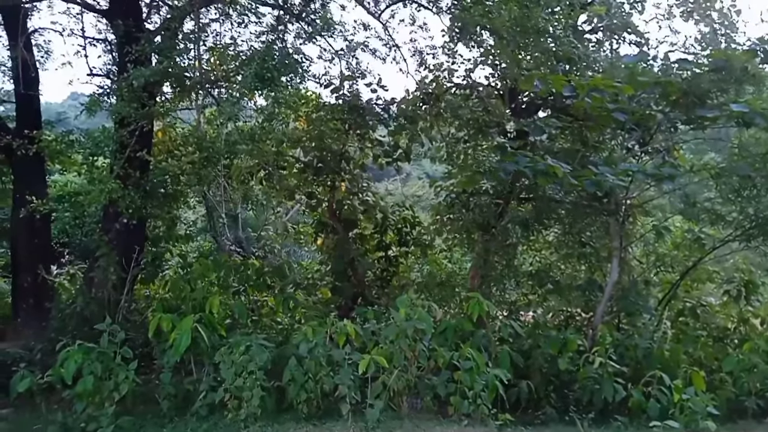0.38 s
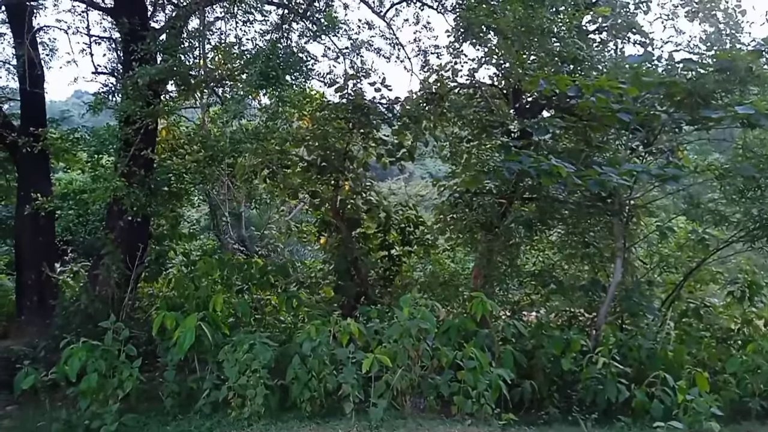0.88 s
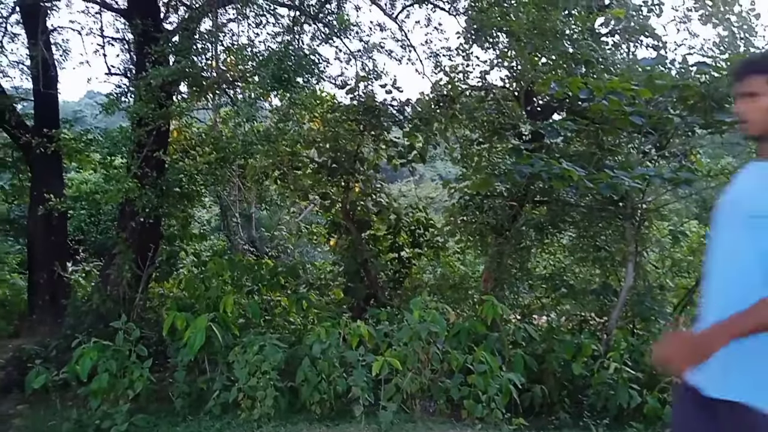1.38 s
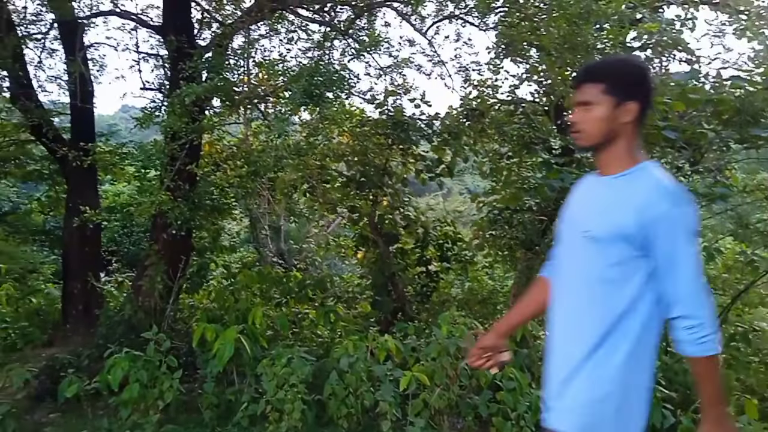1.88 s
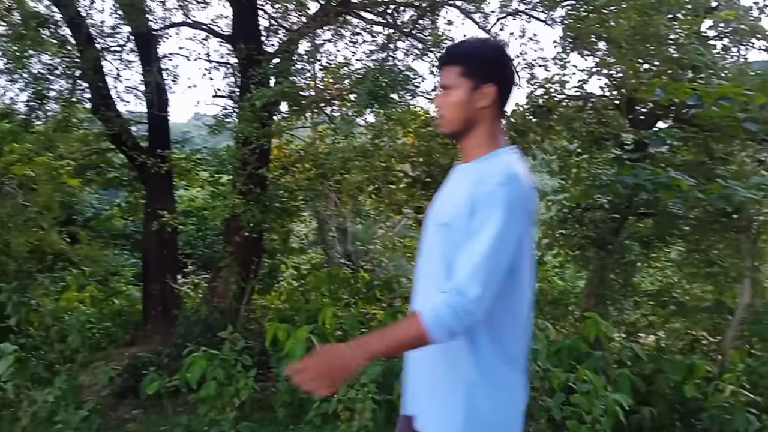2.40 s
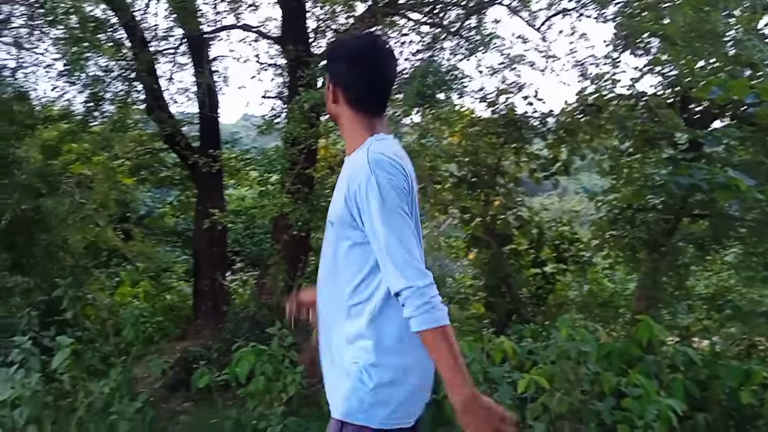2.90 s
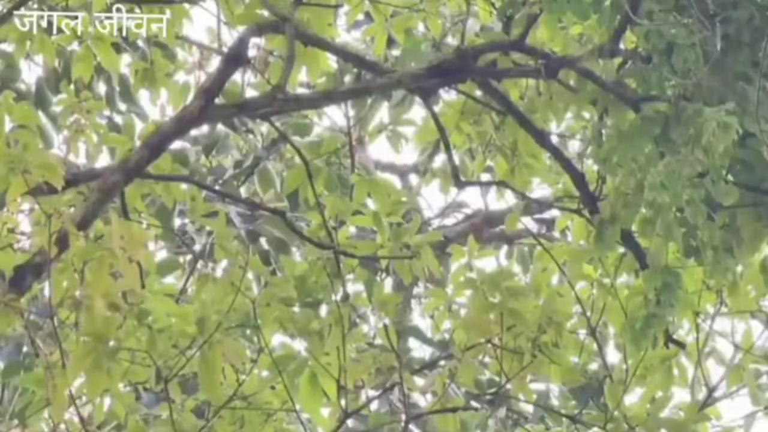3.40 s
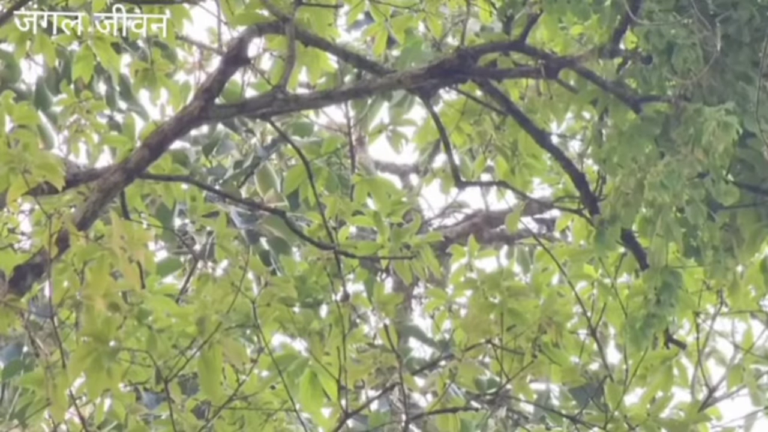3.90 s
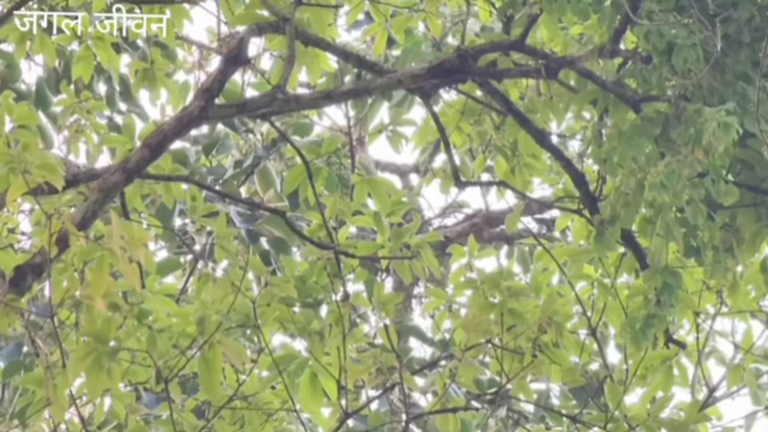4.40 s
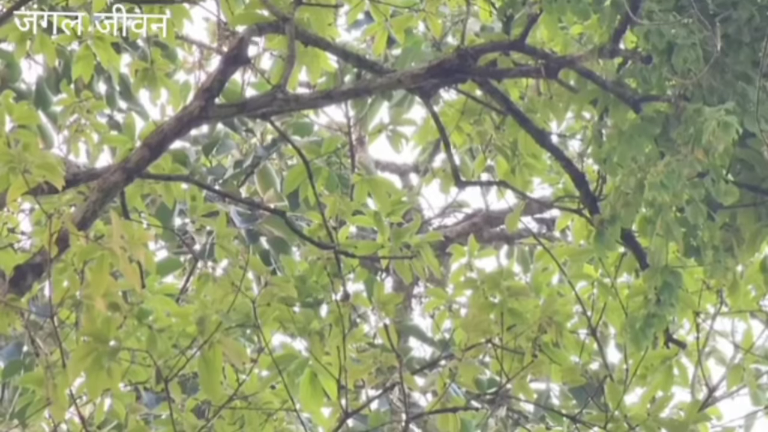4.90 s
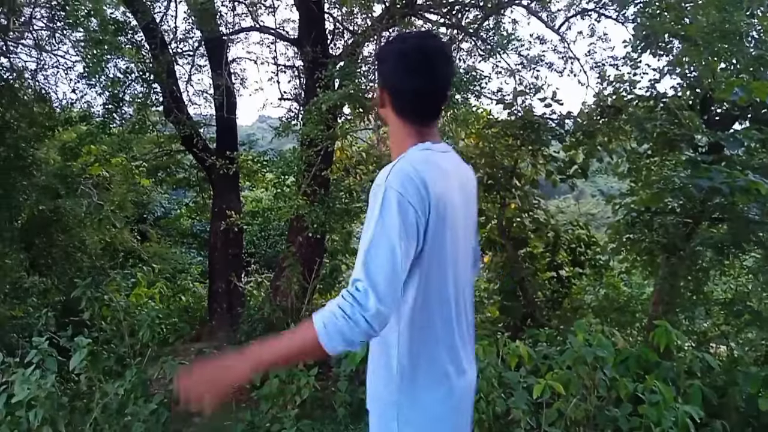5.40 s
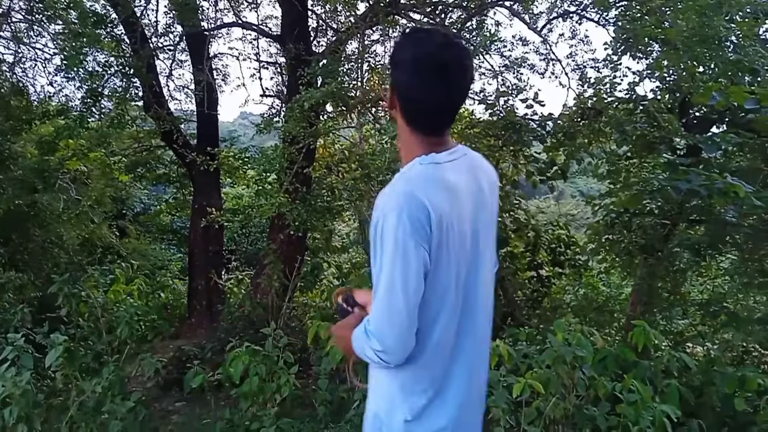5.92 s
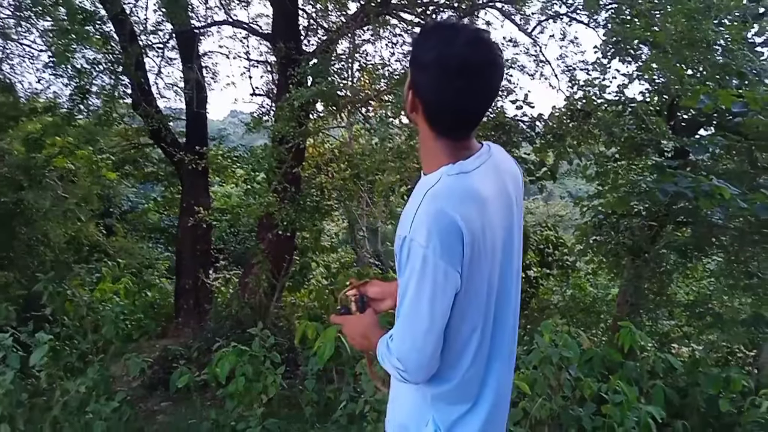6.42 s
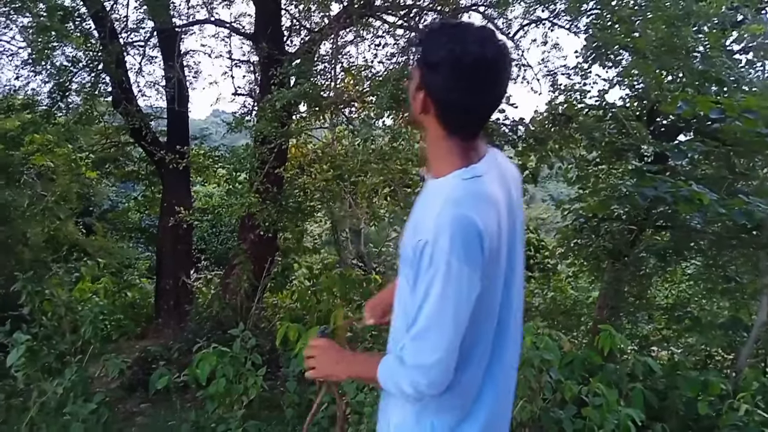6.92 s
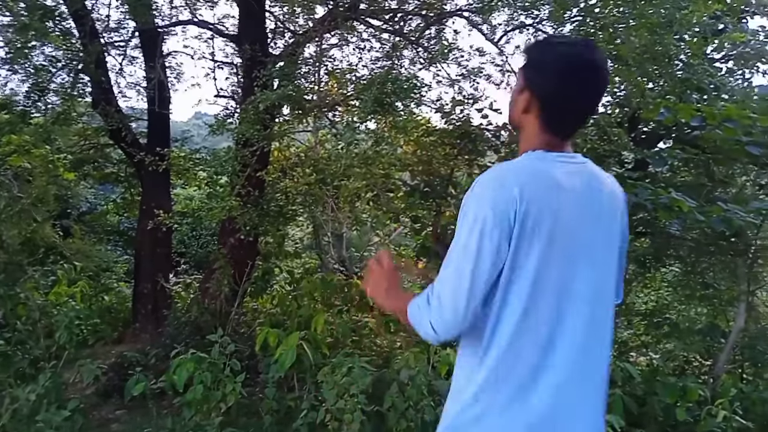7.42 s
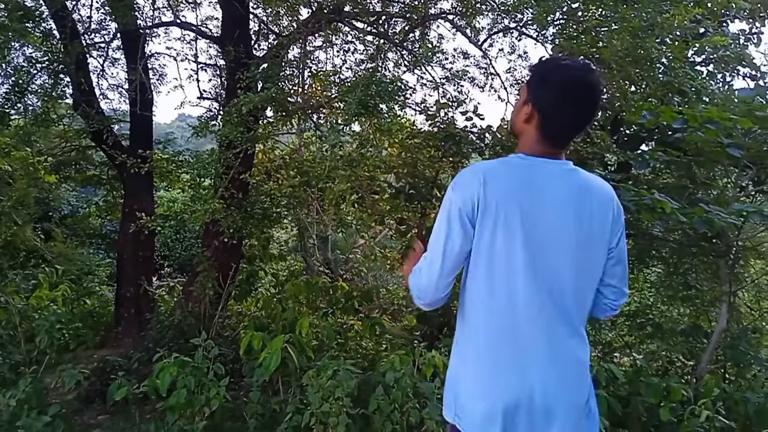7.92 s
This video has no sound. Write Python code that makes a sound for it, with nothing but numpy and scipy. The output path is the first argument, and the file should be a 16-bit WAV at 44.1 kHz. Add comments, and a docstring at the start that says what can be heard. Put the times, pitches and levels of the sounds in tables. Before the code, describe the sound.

Cicadas drone shrilly in a forest with soft leaf steps, cut by two seconds of louder windy canopy full of whistling, trilling, cooing birds.

```python
"""Cicadas drone in a forest, each a pulse train of drum clicks ringing in one band, over soft air and hum.
Someone treads softly through leaf litter close to a phone with one microphone: ringing snaps, crackling grains.
For two seconds the scene fades over to a louder, windy canopy: coloured noise hiss, with treble bands switched
to random levels, and low rumble. There gliding near-sine notes make falling whistles, trills, hoots and coos,
throbbing bands of noise make the insects, and short noisy patches sag near 3.5 kHz."""
import sys
import numpy as np
from scipy import signal
from scipy.fft import rfft, irfft, next_fast_len
from scipy.io import wavfile
from scipy.ndimage import uniform_filter1d

SR = 44100
rng = np.random.default_rng(int(sys.argv[2]) if len(sys.argv) > 2 else 0)


def invert_db(x):
    """Field ratio 10**(x/20) for x, a level in decibels (scalar or array-like)."""
    u = np.asarray(x, float) / 20
    return 10 ** u


def wav_out(sig):
    """Save sig, one row per channel (or a flat mono array), as 16-bit PCM at SR to the path in sys.argv[1]."""
    wavfile.write(sys.argv[1], SR, np.round(np.clip(np.atleast_2d(sig).T, -1, 1) * 32767).astype(np.int16))


N = 355093
T = np.arange(N) / SR

# forest fader, one span before the canopy and one after: time_s, cicada_level_db
FOREST_FADE = [
    [(0.0, -58), (0.05, -61), (0.12, -52), (1.7, -52), (3.35, -52.5), (3.44, -68.5)],
    [(5.5, -63), (5.58, -53.5), (8.06, -52.5)],
]
# tone of the whole cicada chorus: freq_hz, gain_db
CICADA_TONE = [(3410, -67), (5800, -32), (6370, -24.5), (6570, -26), (6960, -15), (7950, -14.5), (8940, -7),
               (9310, -1.5), (10300, -11), (11700, -21.5), (12700, -38), (13500, -38), (14700, -22),
               (15200, -20.5)]
# spectrum of the air, an early curve and a late one: freq_hz, density_db (relative, per Hz)
AIR_TONES = [
    [(15, -43), (25, -10), (38, -19), (81, 1), (184, -5.5), (231, -1.5), (606, -9.5), (728, -10),
     (1910, -15), (4880, -24.5), (6000, -21.5), (7800, -57), (13200, -120)],
    [(15, -69), (25, -27), (48, -22), (65, -4), (160, -3.5), (201, -4), (237, -7.5), (265, -11),
     (341, -9.5), (3380, -25), (6000, -31.5), (7800, -56), (13200, -120)],
]
# one cicada a row: buckling_pairs_per_s, body_centre_hz, body_width_hz, level_db (relative)
SINGERS = [(375.3, 7930, 3000, 0), (368.2, 7240, 1200, -5.5), (396.7, 9330, 3070, -1),
           (399.8, 9540, 4300, 0.5), (403.6, 9600, 3500, -5.5)]
# distant hum partials: pitch_hz, level_db (rms before it wanders, with the forest fader at -52.5 dB)
HUM = [(80.7, -88), (156.1, -82), (236.9, -82.5)]
# faint gliding far whistles: start_s, end_s, from_hz, to_hz, middle_level_db
FAR_WHISTLES = [(.004, 0.073, 3080, 3000, -80), (3.375, 3.665, 2140, 2133, -54.5),
                (3.82, 4.004, 1850, 1930, -56.5), (3.988, 4.14, 1710, 1630, -54.5),
                (5.08, 5.24, 2436, 2466, -55), (5.38, 5.543, 1113, 1150, -49.5)]
# twigs and leaves snapping: start_s, ring_level_db, ring_hz, crack_level_db
SNAPS = [(0.2353, -56, 2810, -63), (0.531, -58, 1630, -49), (0.6848, -63, 2550, -76),
         (0.894, -56, 2150, -76), (1.076, -61, 2670, -75), (1.344, -56, 1800, -60),
         (1.3668, -48.5, 1470, -50), (1.3794, -57, 2810, -71), (1.4517, -53.5, 2850, -57),
         (1.6389, -49.5, 1520, -54), (1.9, -49.5, 3200, -59), (2.1106, -65, 2080, -62),
         (2.233, -56.5, 1650, -57.5), (2.3082, -45, 2370, -56), (2.496, -58, 3800, -58),
         (2.68, -57, 1810, -60), (2.82, -59, 2250, -57), (3.628, -37, 1750, -58), (7.268, -58, 2140, -52.5),
         (7.3975, -56, 3580, -63), (7.5443, -62, 2850, -75), (7.79, -60, 3440, -67),
         (7.8248, -57, 3660, -65)]
# leaves brushed: start_s, end_s, centre_hz, width_hz, level_db
RUSTLES = [(0.227, 0.256, 3500, 2500, -76), (0.35, 0.426, 2380, 2200, -74), (0.454, 0.531, 1150, 1000, -70),
           (0.74, 0.801, 3940, 3000, -73), (0.757, 0.96, 2000, 2400, -77.5),
           (1.339, 1.399, 2570, 3800, -66), (1.392, 1.517, 3000, 3000, -78),
           (1.885, 1.916, 3000, 3000, -69), (2.02, 2.09, 2200, 2200, -78),
           (2.467, 2.574, 3700, 1400, -78.5), (2.62, 2.73, 2410, 2200, -74),
           (3.117, 3.175, 3700, 3500, -76.5), (7.242, 7.306, 3500, 2500, -76),
           (7.32, 7.498, 2190, 805, -82.5), (7.355, 7.496, 3800, 1900, -78), (7.533, 7.56, 3300, 2610, -72),
           (7.767, 7.835, 3950, 1600, -73.5), (7.792, 7.872, 2470, 1200, -80.5)]
# spectrum of the canopy hiss before its treble bands are switched: freq_hz, density_db (relative, per Hz)
HISS_TONE = [(88, -32), (150, -6), (590, -10), (715, -17), (1160, -7), (1540, -12), (3800, -13.5),
             (4300, -5.5), (5100, -12.5), (6200, -9.5), (6950, -20.5), (8250, -18), (10000, -30),
             (15000, -25)]
# edges of the treble bands switched to random levels: edge_hz
PATCH_EDGES = [3200, 4000, 4800, 5600, 6800, 8000, 9600, 12000, 12600, 13200, 13800, 14400, 15200]
# canopy hiss fader: time_s, level_db (rms from 1500 to 3030 Hz, before it wanders)
HISS_FADE = [(3.29, -80), (3.35, -59.5), (3.42, -56), (4.3, -55), (5.2, -55), (5.45, -50.5), (5.55, -54),
             (5.62, -63), (5.632, -69), (5.68, -72)]
# spectrum of the wind rumble: freq_hz, density_db (relative, per Hz)
WIND_TONE = [(12, -27), (20, 3), (134, -0.5), (193, -11.5), (296, -7.5), (400, -16), (520, -45),
             (880, -120)]
# wind gusts: time_s, level_db
GUST_FADE = [(3.3, -84), (3.37, -58.5), (3.45, -57.5), (3.92, -56), (4.55, -58.5), (5.0, -56.5),
             (5.1, -53.5), (5.45, -54), (5.52, -49), (5.62, -54.5), (5.635, -79)]
# far murmur of birds: time_s, level_db (of each of its two pitches)
MURMUR_FADE = [(3.32, -76), (3.38, -57), (3.6, -57.5), (3.77, -68), (4.13, -55.5), (4.47, -66), (4.95, -53),
               (5.2, -70.5), (5.49, -51), (5.57, -54), (5.63, -85)]
# bird trills: start_s, end_s, centre_hz, level_db
TRILLS = [(3.368, 3.497, 5450, -38.5), (3.866, 4.026, 5350, -38.5), (4.124, 4.213, 5500, -45.5),
          (4.28, 4.384, 5600, -41.5), (4.459, 4.56, 5450, -38), (4.7, 4.778, 5500, -40.5),
          (4.806, 4.932, 5400, -39.5), (5.043, 5.147, 5600, -45.5)]
# stretches where throbbing insect noise is heard, low band and high band: start_s, end_s, centre_hz, level_db
CHIRRS = [(3.37, 3.701, 6050, -49), (3.709, 3.977, 6150, -47), (4.012, 4.12, 6160, -46.5),
          (4.13, 4.211, 6120, -45), (4.234, 4.38, 6100, -47.5), (4.396, 4.421, 6200, -49.5),
          (4.44, 4.536, 6000, -45.5), (4.596, 4.757, 6130, -45.5), (4.777, 4.796, 6150, -43),
          (4.837, 4.936, 6100, -45.5), (4.962, 5.119, 6150, -46.5), (5.158, 5.18, 6100, -51),
          (5.3, 5.413, 6100, -54), (5.513, 5.626, 6030, -56.5), (3.504, 3.648, 7370, -51),
          (3.774, 3.822, 7000, -48.5), (4.25, 4.338, 8200, -56), (4.4, 4.462, 7900, -49.5),
          (4.615, 4.855, 7550, -57), (4.997, 5.024, 7000, -46), (5.216, 5.232, 7270, -47),
          (5.253, 5.269, 7300, -46.5), (5.321, 5.378, 7450, -49), (5.42, 5.543, 7700, -56.5)]
# the low insect band, then the high one: width_hz, throbs_per_s
CHOIRS = [(840, 58), (620, 88)]
# a far barbet repeating a hollow note: start_s, level_db, pitch_hz
HOOTS = [(3.456, -42.5, 1139), (3.556, -47, 1124), (3.629, -45, 1156), (3.9947, -45, 1170),
         (4.064, -44.5, 986), (4.1357, -42.5, 1030), (4.195, -42.5, 1138), (4.2835, -42, 1161),
         (4.8136, -46.5, 1220), (4.8837, -48, 1150), (4.95, -38, 1255), (5.029, -47.5, 1148),
         (5.492, -42, 1196)]
# the slide every falling whistle shares: after_knee_s, pitch_hz, breath (0-1)
SLIDE = [(0, 4023, 0.24), (.04, 3873, 0.5), (.1, 3753, .24), (.15, 3573, .4), (.22, 3110, .6),
         (.3, 2845, 0.9), (.37, 2577, .95)]
# falling whistles: knee_s, dive_hz_per_s, audible pieces (start_s, end_s, level_db)
FALLS = [(3.7, 13000, [(3.645, 3.724, -46.5), (3.736, 3.762, -38), (3.794, 3.83, -37.5),
         (3.826, 3.856, -34), (3.872, 3.9, -46.5), (3.905, 3.945, -46.5), (3.95, 4.0, -46),
         (3.995, 4.07, -50)]), (3.998, 5500, [(4.012, 4.04, -41.5), (4.052, 4.1, -41), (4.113, 4.14, -44),
         (4.195, 4.25, -44.5), (4.25, 4.34, -51.5)]), (5.21, 7800, [(5.115, 5.15, -42.5),
         (5.145, 5.195, -37)]), (5.206, 22700, [(5.152, 5.172, -39), (5.163, 5.188, -28),
         (5.182, 5.205, -29), (5.198, 5.279, -35.5), (5.293, 5.32, -32.5), (5.352, 5.38, -31.5),
         (5.42, 5.53, -45), (5.525, 5.57, -53)])]
# short noisy patches near 3.5 kHz: start_s, end_s, middle_level_db
NOISE_PATCHES = [(3.936, 3.961, -39.5), (3.969, 4, -44.5), (4.156, 4.183, -41), (5.388, 5.417, -37),
                 (5.456, 5.476, -42), (5.517, 5.542, -47)]
# a cooing bird: start_s, end_s, pitch_hz, level_db (after the attack), end_level_db
COOS = [(4.666, 4.874, 1438, -37.5, -50), (4.86, 4.977, 1433, -48, -45), (4.666, 4.721, 1308, -42, -49.5),
        (4.9, 5.007, 1315, -38.5, -34.5), (5.052, 5.17, 1320, -46.5, -37), (5.157, 5.314, 1378, -44, -43.5),
        (5.309, 5.5, 1380, -45.5, -53)]
# one breathy rising answer: start_s, end_s, from_hz, to_hz, level_db
ANSWER = (5.215, 5.367, 4760, 5450, -44)


def unit(x):
    """Scale to rms 1."""
    return x / np.sqrt(np.mean(x ** 2))


def colour(x, points):
    """Filter by (Hz, dB) points joined on a log frequency axis."""
    size = next_fast_len(len(x))
    hz, db = np.transpose(points)
    f = np.maximum(np.arange(size // 2 + 1) * SR / size, 1)
    curve = invert_db(np.interp(np.log(f), np.log(hz), db))
    return irfft(rfft(x, size) * curve, size)[:len(x)]


def band(x, lo_hz, hi_hz, order=2):
    """Band-pass with Butterworth slopes."""
    return signal.sosfilt(signal.butter(order, [lo_hz, hi_hz], "band", fs=SR, output="sos"), x)


def fader(spans):
    """Gain through one or more spans of (s, dB) points, silent outside them."""
    total = 0
    for span in spans:
        s, db = np.transpose(span)
        total = total + invert_db(np.interp(T, s, db, left=-200, right=-200))
    return total


def walk(rate, n=N):
    """Random levels held 1 / rate s and slewed twice; spread near 1."""
    hold = int(SR / rate)
    held = np.repeat(rng.standard_normal(n // hold + 1), hold)
    return 1.3 * uniform_filter1d(uniform_filter1d(held, hold), hold)[:n]


def clicks(rate, scatter_db, weak_db):
    """A band-limited click at each turn of the phase; every second one is shifted by weak_db."""
    phase = np.cumsum(rate) / SR + rng.random()
    turn = np.round(phase).astype(int)
    off = (phase - turn) / rate * SR  # samples from the nearest click
    scatter = scatter_db * rng.standard_normal(N // 20)[turn]
    size = invert_db(scatter + weak_db * (turn % 2))
    return size * np.sinc(.8 * off) * np.exp(-(off / 8) ** 2)


def trees(x, t60, wet_db):
    """Trunks and leaves scatter the sound into a dense tail that falls 60 dB in t60 seconds."""
    t = np.arange(SR // 2) / SR
    tail = rng.standard_normal(len(t)) * np.exp(-np.log(1000) * t / t60)
    return x + invert_db(wet_db) * signal.fftconvolve(x, tail / np.linalg.norm(tail))[:len(x)]


def burst(start, end, hz, width, noise, edge):
    """Sample places and a stretch of noise ringing in one band; edge: both fades together, in samples."""
    i = np.arange(int(start * SR), int(end * SR))
    ring = unit(band(noise, hz - width / 2, hz + width / 2, order=3))[-len(i):]
    return i, ring * signal.windows.tukey(len(i), min(edge / len(i), 1))


def whistles(notes, blur_hz, flutter_db):
    """Near-sine notes of (s, Hz, dB, breath) points; breath trades the clean tone for a noisy band around it."""
    out = np.zeros(N)
    for note in notes:
        s, hz, db, breath = np.transpose(note)
        i = np.arange(int(s[0] * SR), int(s[-1] * SR))
        hz, db, breath = (np.interp(T[i], s, c) for c in (hz, db, breath))
        breath = np.clip(breath, 0, 1)
        wobble = walk(blur_hz, len(i)) + 1j * walk(blur_hz, len(i))
        carrier = np.exp(2j * np.pi * np.cumsum(hz) / SR)
        tone = carrier * (np.sqrt(2 - 2 * breath) + np.sqrt(breath) * wobble)
        level = invert_db(db + flutter_db * walk(70, len(i)))
        out[i] += level * tone.real * signal.windows.tukey(len(i), min(400 / len(i), 1))
    return out


def cicadas():
    """Each singer buckles its two drums in turn, strong then weak; the wavering pace blurs the high lines."""
    choir = 0
    for pairs, hz, width, db in SINGERS:
        pace = 1 + .002 * walk(3) + .0045 * walk(45)
        drum = clicks(2 * pairs * pace, scatter_db=2.0, weak_db=-16.0)
        body = band(drum, hz - width / 2, hz + width / 2)
        far = trees(body, t60=.15, wet_db=1.5)
        choir = choir + invert_db(db + 1.18 * walk(13)) * unit(far)
    # countless further singers melt into a hiss
    choir = choir + invert_db(4.5) * rng.standard_normal(N)
    return unit(colour(choir, CICADA_TONE))


def air():
    """Soft forest air, brighter at first: coloured noise, with wavering sines as a distant hum."""
    hum = 0
    for hz, db in HUM:
        phase = 2 * np.pi * np.cumsum(hz * (1 + 0.013 * walk(3.0))) / SR
        hum = hum + np.sqrt(2) * invert_db(db + 3.2 * walk(9.5)) * np.sin(phase)
    early, late = (unit(colour(rng.standard_normal(N), tone)) for tone in AIR_TONES)
    noise = np.where(T < 4.5, early * invert_db(-72.0), late * invert_db(-72.5))
    # the lift sets air and hum against the fader at -52.5 dB
    return invert_db(52.5) * (invert_db(1.05 * walk(8)) * noise + hum)


def high_hiss():
    """Faint high hiss that fades with the forest: white noise in one band."""
    return invert_db(-38) * unit(band(rng.standard_normal(N), 11500, 15300))


def far_whistles():
    """Far whistles glide straight, loudest in the middle, and ring on among the trunks."""
    swell_db = 4
    notes = []
    for start, end, from_hz, to_hz, db in FAR_WHISTLES:
        notes.append([(start, from_hz, db - swell_db, .6),
                      ((start + end) / 2, (from_hz + to_hz) / 2, db, .4),
                      (end, to_hz, db - swell_db, .5)])
    return trees(whistles(notes, blur_hz=109.2, flutter_db=1.1), t60=.35, wet_db=-4.5)


def steps():
    """Snaps ring for a few milliseconds; leaves crackle as dense uneven grains."""
    out, t = np.zeros(N), np.arange(1000) / SR
    for s, db, hz, crack_db in SNAPS:
        ring = invert_db(db) * np.exp(-t / 0.0016) * np.sin(2 * np.pi * hz * t)
        crack = invert_db(crack_db) * np.exp(-t / 0.0015) * unit(band(rng.standard_normal(1000), 2500, 5500))
        out[int(s * SR):int(s * SR) + 1000] += ring + crack
    for start, end, hz, width, db in RUSTLES:
        grains = rng.standard_normal(SR // 4) * invert_db(2.2 * rng.exponential(size=SR // 4))
        i, brush = burst(start, end, hz, width, grains, edge=1100)
        out[i] += invert_db(db + 4 * walk(120, len(i))) * brush
    return out


def switch_treble(x, share, dip_db, jump_db):
    """Each treble band takes a new random level, at times a deep dip, every fiftieth of a second."""
    size = next_fast_len(N)
    spectrum, f = rfft(x, size), np.fft.rfftfreq(size, 1 / SR)
    step = ((T + .002) * 50).astype(int)
    out = irfft(spectrum * ((f < PATCH_EDGES[0]) | (f >= PATCH_EDGES[-1])))[:N]
    for lo, hi in zip(PATCH_EDGES, PATCH_EDGES[1:]):
        chance = rng.standard_normal((2, step[-1] + 2))
        linger = .8 * chance[0, 1:] + .6 * chance[0, :-1]
        # a soft threshold: most moments are open, some nearly shut
        db = dip_db / (1 + np.exp(4 * (linger + share))) + jump_db * chance[1, 1:]
        db = db * (.45 if lo >= 12000 else 1)  # the very top varies less
        patch = irfft(spectrum * (f >= lo) * (f < hi))[:N]
        out += uniform_filter1d(invert_db(db)[step], 110) * patch
    return out


def canopy_hiss():
    """Coloured noise hiss of the leaves; its treble bands are then switched to random levels."""
    hiss = colour(rng.standard_normal(N), HISS_TONE + [(15400, -73.5)])
    hiss = switch_treble(hiss / np.std(band(hiss, 1500, 3030)), share=0.44, dip_db=-26, jump_db=4.0)
    return hiss * fader([HISS_FADE]) * invert_db(2.3 * walk(25))


def wind():
    """Wind rumbles as low coloured noise, rising and falling in gusts."""
    rumble = unit(colour(rng.standard_normal(N), WIND_TONE))
    return rumble * fader([GUST_FADE]) * invert_db(3.4 * walk(16))


def murmur():
    """Far birds merge into narrow noise around two soft pitches."""
    out = 0
    for hz in (1000, 1160):
        out = out + unit(band(rng.standard_normal(N), hz - 45, hz + 45)) * invert_db(1.9 * walk(14))
    return out * fader([MURMUR_FADE])


def trills():
    """Each note of a trill is a quick, rough downward slur."""
    notes_per_s, slur_hz = 87, 1000
    out = np.zeros(N)
    for start, end, hz, db in TRILLS:
        i = np.arange(int(start * SR), int(end * SR))
        turn = np.cumsum(notes_per_s * (1 + .05 * walk(60, len(i)))) / SR % 1
        phase = 2 * np.pi * np.cumsum(hz - slur_hz * (turn - .5)) / SR
        slur = np.sin(phase) * np.sin(np.pi * turn) ** 1.1
        rough = .9 + .45 * walk(400, len(i))
        out[i] += invert_db(db) * rough * slur * signal.windows.tukey(len(i), .3)
    return trees(out, t60=0.042, wet_db=-6)


def chirr():
    """Many crickets scraping together are heard as bands of noise in quick throbs."""
    out = np.zeros(N)
    for start, end, hz, db in CHIRRS:
        width, rate = CHOIRS[int(hz > 6600)]  # the high band is centred above 6600 Hz
        i, choir = burst(start, end, hz, width, rng.standard_normal(SR // 2), edge=160)
        throb = 1 + .45 * np.sin(2 * np.pi * rate * T[i])
        out[i] += invert_db(db + 1.5 * walk(40, len(i))) * throb * choir
    return out


def hoots():
    """A far barbet's short soft sine notes, blurred by distance."""
    out, t = np.zeros(N), np.arange(2400) / SR
    swell = t / 0.0075 * np.exp(1 - t / 0.0076)
    for s, db, hz in HOOTS:
        out[int(s * SR):int(s * SR) + len(t)] += invert_db(db) * swell * np.sin(2 * np.pi * hz * t)
    return trees(out, t60=.3, wet_db=-5.5)


def falls():
    """Audible pieces of each falling whistle; the sound grows noisier as it slides down past its knee."""
    after, slide_hz, slide_breath = np.transpose(SLIDE)
    notes = []
    for knee, dive, pieces in FALLS:
        for start, end, db in pieces:
            s = np.linspace(start, end, 12) - knee
            hz = np.interp(s, after, slide_hz) + dive * np.maximum(-s, 0)
            breath = np.interp(s, after, slide_breath)
            notes.append(np.transpose([s + knee, hz, db + 0 * s, breath]))
    return trees(whistles(notes, blur_hz=440, flutter_db=1.), t60=.14, wet_db=-12.5)


def noise_patches():
    """Short noisy patches near 3.5 kHz, sagging in pitch and level."""
    pitch_hz, sag_hz_per_s, fade_db = 3510, 10000, 6.5
    notes = []
    for start, end, db in NOISE_PATCHES:
        end_hz = pitch_hz - sag_hz_per_s * (end - start)
        notes.append([(start, pitch_hz, db + fade_db / 2, .9), (end, end_hz, db - fade_db / 2, .9)])
    return trees(whistles(notes, blur_hz=800, flutter_db=1.), t60=.14, wet_db=-12.5)


def coos():
    """Coos scoop up to their pitch and ring on among the trunks."""
    attack_s, scoop_hz, start_db = .033, 49.3, -5.5
    notes = []
    for start, end, hz, db, end_db in COOS:
        notes.append([(start, hz - scoop_hz, db + start_db, .5),
                      (start + attack_s, hz, db, .55),
                      (end, hz, end_db, .45)])
    return trees(whistles(notes, blur_hz=109.2, flutter_db=1.1), t60=.35, wet_db=-4.5)


def answer():
    """A rising answer of pure breath: a noisy band with no clean tone."""
    start, end, from_hz, to_hz, db = ANSWER
    note = [(start, from_hz, db, 1), (end, to_hz, db, 1)]
    return trees(whistles([note], blur_hz=800, flutter_db=1.), t60=.14, wet_db=-12.5)


def scene():
    """The forest fades out under the canopy and back; one microphone feeds both channels."""
    forest = fader(FOREST_FADE) * (cicadas() + air() + high_hiss())
    birds = far_whistles() + murmur() + trills() + hoots() + falls() + coos() + answer()
    canopy = canopy_hiss() + wind() + chirr() + noise_patches()
    mono = forest + steps() + canopy + birds
    return np.array([mono, mono])


def low_pass(x):
    """Removes everything above the highest recorded frequency."""
    return signal.sosfilt(signal.butter(12, 15400, fs=SR, output="sos"), x)


def record(dry):
    """The phone stores the finished mix."""
    return low_pass(dry)


dry = scene()
out = record(dry)
wav_out(out)
```